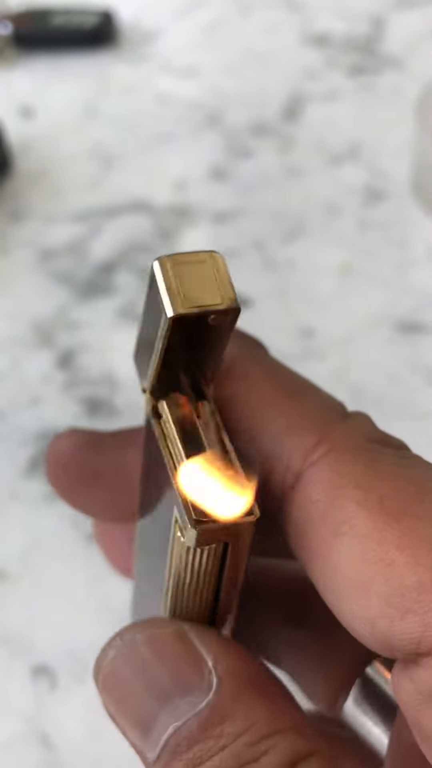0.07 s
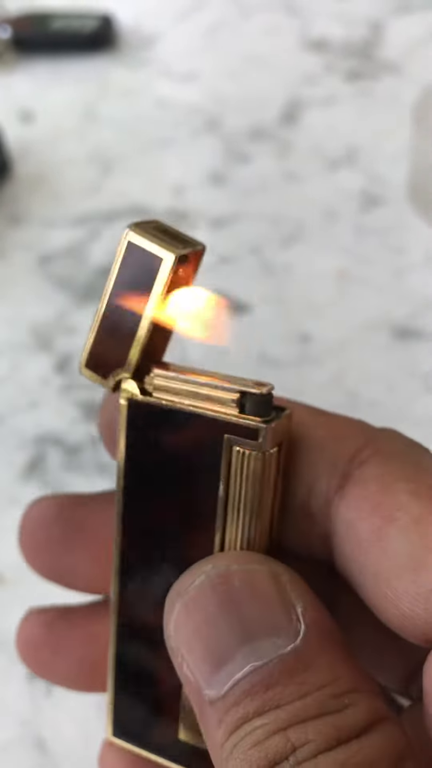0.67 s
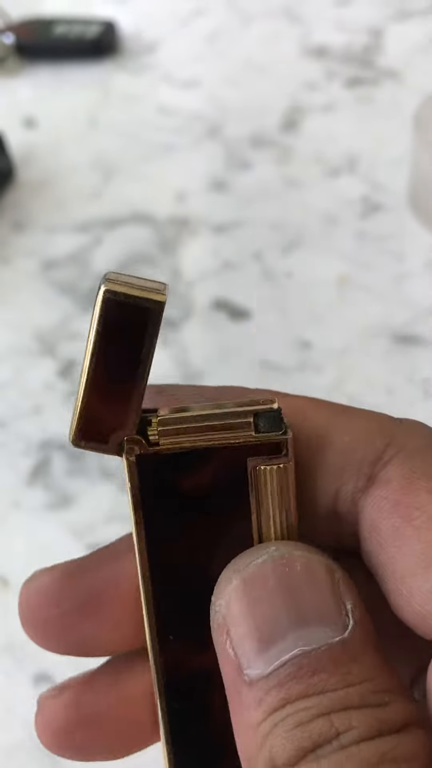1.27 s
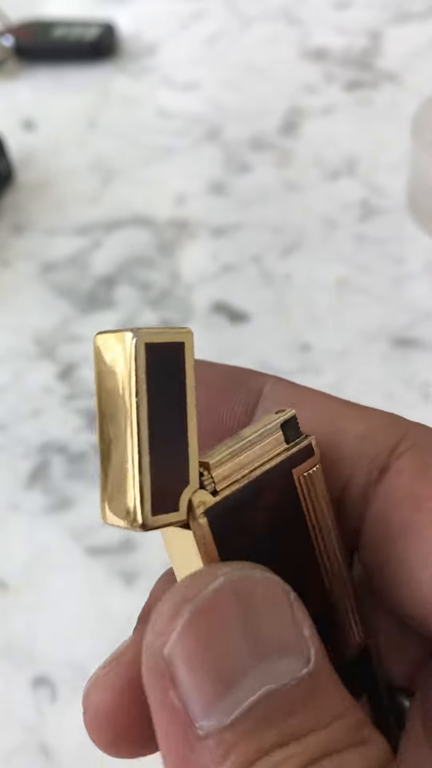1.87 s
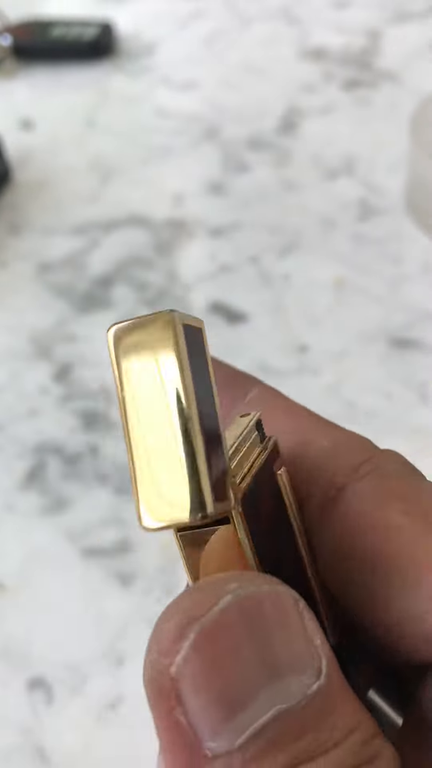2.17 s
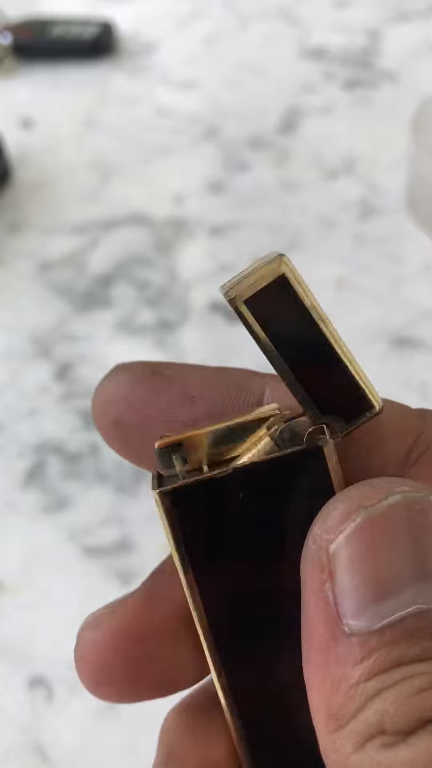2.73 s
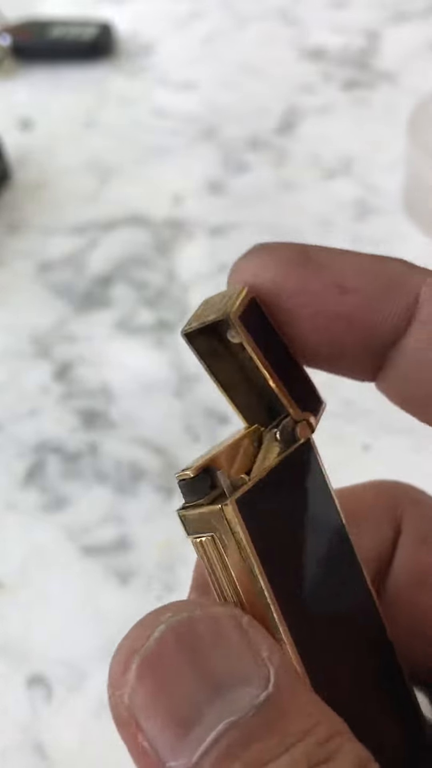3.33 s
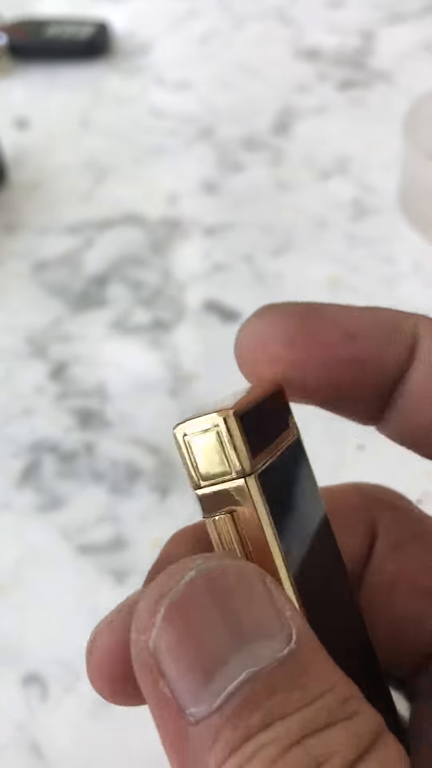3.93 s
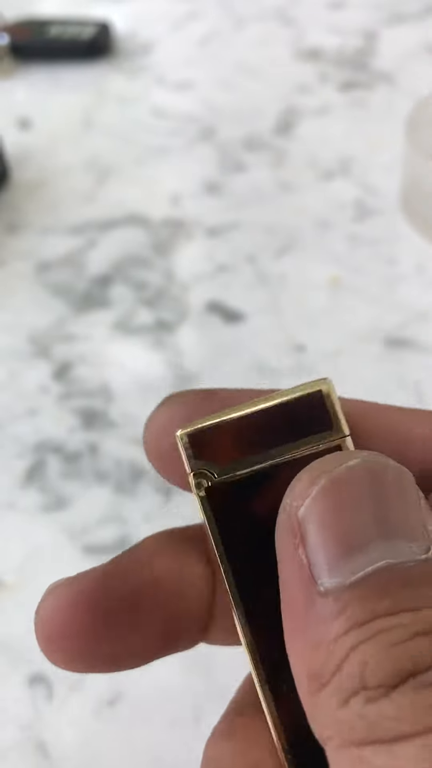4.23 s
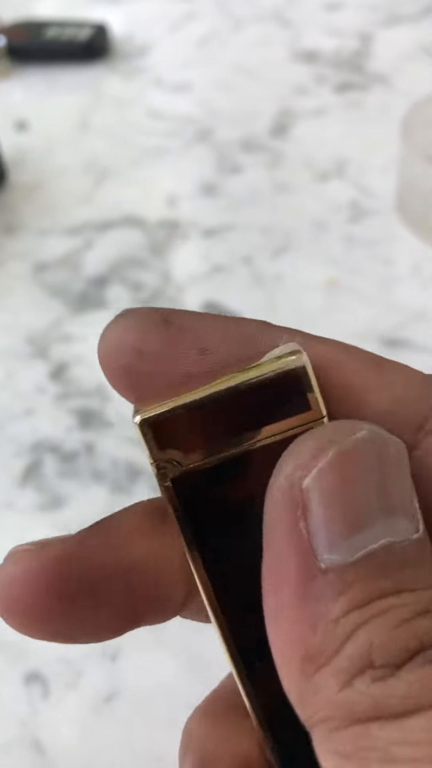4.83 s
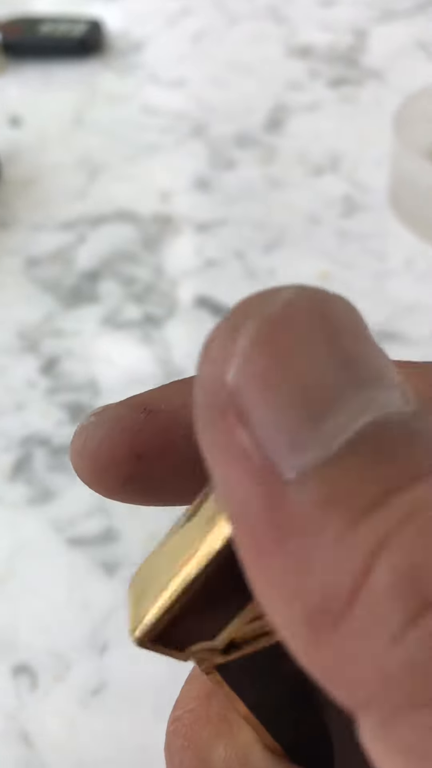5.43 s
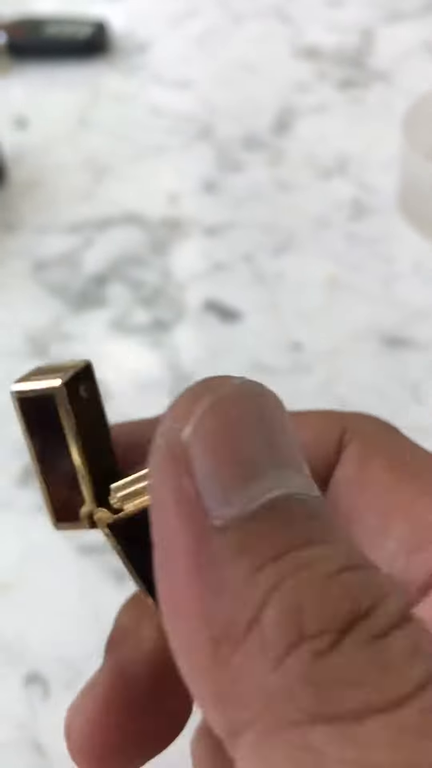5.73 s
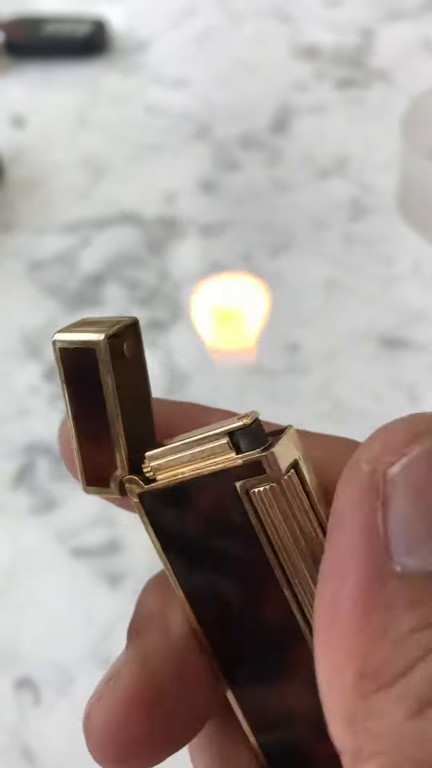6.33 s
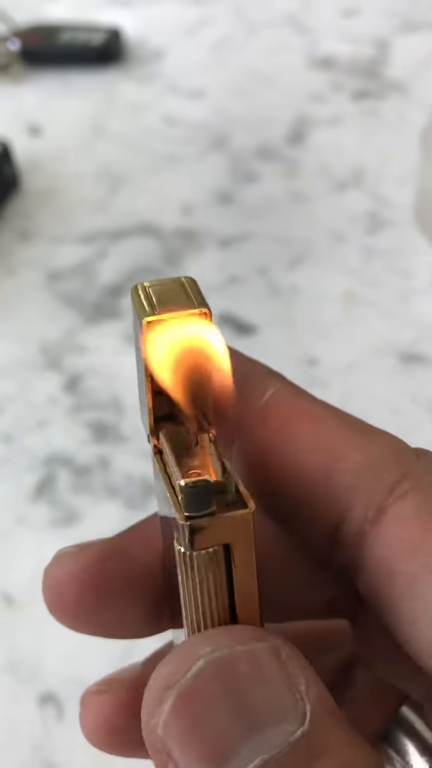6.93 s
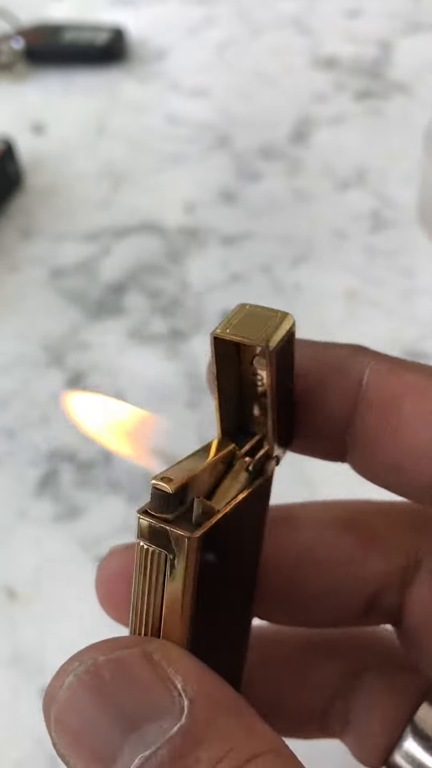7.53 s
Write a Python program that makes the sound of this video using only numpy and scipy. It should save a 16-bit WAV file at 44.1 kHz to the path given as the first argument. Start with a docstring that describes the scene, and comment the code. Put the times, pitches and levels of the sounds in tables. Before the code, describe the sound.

Close to the microphone in a quiet room with a low machine hum and hiss, a lighter's flame flutters out softly amid dull handling bumps. The hinge clicks, then the brass lid snaps shut, loud and sharp. After a few faint finger ticks, the lid flicks open with a bright, short ring. The wheel scrapes the flint once, the flame catches with a soft pop, and a small click follows.

```python
"""A brass flip-top lighter

A lighter is handled close to a microphone in a quiet room with a low machine hum. Its flame flutters
out in moving air, the hinge's spring-loaded cam clicks over and the lid snaps shut. The snap overloads
the recorder, which turns itself down for a moment. Later the lid is flicked open, ringing the brass
case, and the wheel scrapes the flint until the flame catches with a soft pop."""
import sys
import numpy as np
from scipy import signal
from scipy.fft import rfft, irfft, next_fast_len
from scipy.io import wavfile
from scipy.ndimage import uniform_filter1d, minimum_filter1d, map_coordinates

SR = 44100
rng = np.random.default_rng(int(sys.argv[2]) if len(sys.argv) > 2 else 0)


def wav_record(signal):
    """Record a signal, one row per channel, as 16-bit PCM in the file named by sys.argv[1]."""
    frames = np.transpose(np.atleast_2d(signal))
    bounded = np.clip(frames, -1, 1)
    # unit amplitude maps onto the largest positive 16-bit level
    quanta = np.round(bounded * 32767).astype(np.int16)
    wavfile.write(sys.argv[1], SR, quanta)


N = 339570


def amp(db):
    """Turn decibels into a gain."""
    return 10 ** (np.asarray(db) / 20)


def along(points, hz):
    """Read between (pitch_hz, value) points on a scale of octaves."""
    pitches, values = np.transpose(points)
    return np.interp(np.log(hz + 1), np.log(pitches + 1), values)


def swell(peak_s, db, rise_db_per_s, hold_s, fall_db_per_s):
    """A gain that climbs to db at peak_s, holds and dies away."""
    t = np.arange(N) / SR - peak_s
    drop_db = rise_db_per_s * np.maximum(-t, 0) + fall_db_per_s * np.maximum(t - hold_s, 0)
    return amp(np.maximum(db - drop_db, -140))


def wobble(rate_hz):
    """A smooth curve through rate_hz random values a second."""
    return map_coordinates(rng.standard_normal(int(N * rate_hz / SR) + 4), [np.arange(N) * rate_hz / SR])


def filtered(x, response):
    """Shape a sound with a response: a gain and phase for each frequency."""
    size = next_fast_len(len(x) + 8192)
    return irfft(rfft(x, size) * response(np.fft.rfftfreq(size, 1 / SR)), size)[:len(x)]


def ringing(modes):
    """The response of something that rings at a few pitches."""
    return lambda f: sum((-1) ** k * amp(db) * 1j * f * width / (hz * hz - f * f + 1j * f * width)
                         for k, (hz, width, db) in enumerate(modes))


def struck(modes, crack_db):
    """A part's ringing plus the broad crack of the hit itself."""
    return ringing(list(modes) + [(6000, 7200, crack_db)])


def colour(points):
    """A response that follows (pitch_hz, gain_db) points."""
    return lambda f: amp(along(points, f))


def noise(response, grain=1):
    """Shaped noise of average power 1; a varying grain roughens it."""
    return unit_power(filtered(rng.standard_normal(N) * grain, response))


def unit_power(x):
    """Scale a sound to an average power of 1."""
    return x / np.sqrt(np.mean(x ** 2) + 1e-20)


def add(track, start_s, sound):
    """Mix a sound into the track."""
    part = track[round(start_s * SR):][:len(sound)]
    part += sound[:len(part)]


def thud(db, pitch_hz, fade_s, attack_s=0.00026):
    """One low, muffled push. Here and below, fade_s is the time to fall by 60 dB."""
    t = np.arange(SR // 5) / SR
    return amp(db - 60 * t / fade_s) * np.sin(2 * np.pi * pitch_hz * t) * (1 - np.exp(-t / attack_s))


def contact(db, scrape_s, response, surface):
    """A short, rough scrape rings a part; db is its level if packed into one millisecond."""
    t = np.arange(len(surface)) / SR
    fade = amp(-60 * t / scrape_s) * (1 - np.exp(-20 * t / scrape_s))
    force = surface * fade
    # so brief a force drives all frequencies about equally
    for _ in range(3):
        flat_spectrum = np.exp(1j * np.angle(rfft(force)))
        force = irfft(flat_spectrum) * np.sqrt(fade)
    sound = filtered(force, response)
    return amp(db) * sound / np.linalg.norm(sound) * np.sqrt(SR / 1000)


def clatter(hits, response):
    """One or more contacts on the same rough spot."""
    out = np.zeros(N)
    surface = rng.standard_normal(2048)
    for start_s, db, scrape_s in hits:
        add(out, start_s, contact(db, scrape_s, response, surface))
    return out


# the machine's tones: pitch_hz, level_db
HUM_TONES = [(30, -47), (62, -62), (90, -57.5), (120, -54.5), (214, -63), (242, -62.5), (463, -62),
             (583, -66), (694, -67.5), (996, -66.5), (1335, -64), (1647, -62.5), (2073, -77), (2903, -70),
             (3112, -67)]
def machine_hum(drift=0.044):
    """A steady hum whose higher tones waver most."""
    t = np.arange(N) / SR
    out = np.zeros(N)
    for hz, db in HUM_TONES:
        waver = drift * np.sqrt(hz) * wobble(rate_hz=13)
        out += amp(db) * np.sqrt(2) * np.sin(2 * np.pi * hz * t + waver)
    return out


# tone colour of the room's air: pitch_hz, gain_db
AIR_COLOUR = [(20, -11.5), (45, -8), (70, -9.5), (130, -8.5), (200, -11), (300, -13.5), (400, -19.5),
              (560, -17), (780, -23), (1000, -18.5), (1600, -19.5), (2400, -19.5), (3200, -23.5),
              (4400, -28), (6000, -57)]
# tone colour of the microphone's hiss: pitch_hz, gain_db
HISS_COLOUR = [(2500, -52), (4300, 6), (5000, -2), (6000, 3), (7000, 2), (7700, -2), (9000, 1),
               (10250, -3.5), (11200, -14), (12500, -28.5), (13600, 0.5), (15000, 3.5), (16000, -0.5)]
# narrow peaks in the hiss: pitch_hz, width_hz, gain_db
HISS_PEAKS = [(1633, 90, 4.5), (5190, 280, -7), (6580, 260, -8.5), (9430, 240, -8.5), (10790, 300, -11),
              (12056, 240, 2), (13450, 410, -7.5)]
def air_and_hiss(air_db=-46, hiss_db=-56, whistle_db=-54):
    """Room air rushes softly under a faintly whistling microphone hiss."""
    air = amp(air_db) * noise(colour(AIR_COLOUR))
    hiss = amp(hiss_db) * noise(colour(HISS_COLOUR))
    return air + hiss + amp(whistle_db) * noise(ringing(HISS_PEAKS))


# tone colour of the flame's rush: pitch_hz, gain_db
FLAME_COLOUR = [(40, -14), (110, -3), (350, 0), (600, -6), (1000, -15), (2500, -45)]
# flaps of the flame, the last as it catches: peak_s, rush_db, pop_db
FLAME_FLAPS = [(.95, -50, -30), (1.044, -42.5, -20.5), (1.296, -42.5, -36), (1.412, -48, -30),
               (6.081, -49, -26)]
def flame():
    """The flame flaps in moving air or catches: a short, low rush with a pop at its height."""
    flaps = sum(swell(peak_s, db, rise_db_per_s=280, hold_s=0.0069, fall_db_per_s=330)
                for peak_s, db, _ in FLAME_FLAPS)
    out = noise(colour(FLAME_COLOUR)) * flaps
    for peak_s, _, pop_db in FLAME_FLAPS:
        add(out, peak_s, thud(pop_db, pitch_hz=169, fade_s=0.016))
    return out


# tone colour of air stirred by the hand: pitch_hz, gain_db
RUMBLE_COLOUR = [(25, -45), (45, -22), (65, 9.5), (90, -20), (150, -15.5), (400, -50)]
# turns of the hand: peak_s, hold_s, level_db, rise_db_per_s
HAND_TURNS = [(1.003, 0.47, -45, 13), (1.97, 0.68, -45, 70), (3.23, 0.056, -37, 55), (3.83, .08, -50, 110)]
# shifts of the grip: start_s, level_db
GRIP_BUMPS = [(1.219, -28), (1.39, -30), (1.468, -33), (1.579, -36), (1.856, -28.5), (2.115, -29.5)]
def hand():
    """Air rumbles as the hand turns the lighter, and the shifting grip makes dull bumps."""
    turns = [swell(peak_s, db, rise, hold_s, fall_db_per_s=90) for peak_s, hold_s, db, rise in HAND_TURNS]
    out = noise(colour(RUMBLE_COLOUR)) * np.max(turns, axis=0)
    for start_s, db in GRIP_BUMPS:
        add(out, start_s, thud(db, pitch_hz=81, fade_s=0.045))
    return out


# how the brass case rings: pitch_hz, width_hz, gain_db
CASE_RING = [(1390, 1800, -41), (2730, 500, -33), (3880, 250, -7), (4570, 200, 7.5), (4960, 260, -2),
             (5380, 290, -1), (6630, 390, 0), (7100, 420, -3), (8070, 320, -1.5), (8600, 220, -6),
             (9100, 210, -4), (9600, 230, 0.5), (11300, 540, -4), (12300, 370, -2), (13540, 500, -1),
             (14100, 770, -4.5), (15200, 700, -21)]
# light touches on the case: start_s, level_db, pitch_hz
FINGER_TICKS = [(1.9015, -40.5, 5700), (3.4382, -43, 5700), (3.985, -41, 5900), (3.995, -46, 5800),
                (4.9757, -47, 9200), (5.163, -40, 7140), (5.2381, -43.5, 8700), (5.94, -37, 4930)]
def finger_ticks(sharpness=11, case_db=-13, scrape_s=0.016):
    """The case ticks in the fingers, near one pitch each time, over a faint ring of brass."""
    out = np.zeros(N)
    for start_s, db, hz in FINGER_TICKS:
        tick = ringing([(hz, hz / sharpness, 0)])
        body = lambda f: amp(case_db) * ringing(CASE_RING)(f) - tick(f)
        out += clatter([(start_s, db, scrape_s)], body)
    return out


# how the spring-loaded cam rings: pitch_hz, width_hz, gain_db
CAM_RING = [(2930, 430, 1), (3800, 370, 4), (5100, 850, -1), (8050, 340, -7), (9400, 450, -2.5),
            (10450, 250, -3), (12500, 1800, -12)]
def hinge_cam(start_s=2.7648, db=-17, loss_db=8.5, first_gap_s=0.0045, shrink=0.54, scrape_s=0.005):
    """The cam, a small lever in the hinge, tips over and bounces, each time sooner and weaker."""
    bounces = []
    for k in range(3):
        delay_s = first_gap_s * (1 - shrink ** k) / (1 - shrink)
        bounces.append((start_s + delay_s, db - loss_db * k, scrape_s))
    return clatter(bounces, struck(CAM_RING, crack_db=-36))


# hits of the closing lid, timed from the hardest: offset_s, level_db, scrape_s
LID_HITS = [(-.0229, -32, .005), (-.0036, -23, .02), (0, 1, .0055), (.0027, -16, .007), (.0047, -6, .006),
            (.0118, -21.5, .035)]
# tone colour of the lid hitting the case: pitch_hz, gain_db
RIM_COLOUR = [(500, -37), (1300, -31), (1900, -20), (2400, -4), (2850, 2), (3600, -6), (4400, -1.5),
              (5500, -6), (6700, -10), (8600, -5), (10600, -7), (11500, 4), (12300, -1), (12900, 3),
              (13800, -3), (14500, 1), (15700, -1), (17000, -40)]
def lid_snap(shut_s):
    """The lid touches, rides over the catch, strikes, rebounds, seats and settles."""
    hits = [(shut_s + offset_s, db, scrape_s) for offset_s, db, scrape_s in LID_HITS]
    return clatter(hits, colour(RIM_COLOUR))


# low thuds around the lid's hardest hit: offset_s, level_db, pitch_hz, fade_s
LID_JOLTS = [(-.0006, -18.5, 78, 0.062), (.0026, -13, 202, 0.023)]
def lid_jolt(shut_s):
    """The closing lid jolts the lighter in the hand."""
    out = np.zeros(N)
    for offset_s, db, hz, fade_s in LID_JOLTS:
        add(out, shut_s + offset_s, thud(db, hz, fade_s))
    return out


# how the lid's catch rings: pitch_hz, width_hz, gain_db
CATCH_RING = [(6010, 350, -12), (8900, 510, 1)]
def lid_catch(start_s=5.4381, db=-29, scrape_s=0.0037):
    """The catch lets go of the lid with a small click."""
    return clatter([(start_s, db, scrape_s)], struck(CATCH_RING, crack_db=-22))


def lid_opening(peak_s=5.5022, peak_db=-8, growth_db=6, loss_db=7, gap_s=0.0019, scrape_s=0.0065):
    """The lid chatters against its stop, ringing the case over a faint knock."""
    knock = ringing([(600, 900, -27)])
    body = lambda f: struck(CASE_RING, crack_db=-19)(f) + knock(f)
    out = np.zeros(N)
    for k in range(-4, 3):  # hit 0 is the hardest
        db = peak_db + min(growth_db * k, -loss_db * k)
        out += clatter([(peak_s + gap_s * k, db, scrape_s)], body)
    return out


# tone colour of the scraped flint: pitch_hz, gain_db
FLINT_COLOUR = [(1000, -22), (2000, -14), (3000, -8), (4300, -3), (5400, -6), (7000, -5), (9500, -8),
                (11000, -8), (12300, -7), (13300, 0), (15200, -2), (16000, -8), (17000, -40)]
# how the wheel rings on its axle: pitch_hz, width_hz, gain_db
WHEEL_RING = [(3050, 250, -8), (4460, 220, 5), (5300, 300, -6), (7950, 480, -5), (13000, 2500, -13)]
# the wheel clicks as it stops and as the thumb leaves it: start_s, level_db
WHEEL_STOPS = [(6.0766, -36), (6.0796, -41), (6.2794, -27.5)]
def flint_wheel(peak_s=6.0625, rasp_db=-27.5, ring_db=-35.5, grit_db=1.5, click_scrape_s=0.004):
    """The thumb spins the wheel; its teeth grind the flint in uneven bites as it rings, then it clicks."""
    bites = rng.standard_normal(N) * amp(-grit_db * wobble(rate_hz=900))
    rasp = unit_power(filtered(bites, colour(FLINT_COLOUR)))
    ring = unit_power(filtered(bites, ringing(WHEEL_RING)))
    thumb = dict(hold_s=0.0075, fall_db_per_s=3200)  # holds briefly, then slips off
    rasp *= swell(peak_s, rasp_db, rise_db_per_s=700, **thumb)
    ring *= swell(peak_s, ring_db, rise_db_per_s=450, **thumb)
    clicks = [(start_s, db, click_scrape_s) for start_s, db in WHEEL_STOPS]
    return rasp + ring + clatter(clicks, struck(WHEEL_RING, crack_db=-26))


# how long the room's echo lasts: pitch_hz, fade_s
ECHO_FADES = [(200, 0.24), (3000, 0.28), (8000, 0.22), (15000, 0.17)]
def room_echo(x, gap_s=0.00124):
    """The walls answer after a tiny gap, the treble dying first."""
    hz, t, spectrum = signal.stft(rng.standard_normal(SR // 2), SR, nperseg=256)
    fade = amp(-60 * t / along(ECHO_FADES, hz)[:, None])
    tail = signal.istft(spectrum * fade, SR, nperseg=256)[1]
    tail *= np.arange(len(tail)) / SR > gap_s
    return signal.fftconvolve(x, tail / np.linalg.norm(tail))[:N]


def scene(shut_s=3.5699, snap_echo_db=-15, click_echo_db=-27):
    """The lighter close up; the hard snap fills the room most."""
    snap = lid_snap(shut_s)
    clicks = hinge_cam() + lid_catch() + lid_opening() + finger_ticks() + flint_wheel()
    echo = amp(snap_echo_db) * room_echo(snap) + amp(click_echo_db) * room_echo(clicks)
    return snap + clicks + echo + flame() + hand() + lid_jolt(shut_s) + machine_hum() + air_and_hiss()


def record(dry, overload_power=0.38, dip_db=-5, hold_s=0.201, recover_s=0.008, ceiling=0.8, top_hz=15850):
    """An overload turns the level down briefly; peaks are held back and the highest treble is cut."""
    overload = uniform_filter1d(dry ** 2, size=44) > overload_power
    t = np.arange(N) / SR
    since_overload_s = t - np.maximum.accumulate(np.where(overload, t, -1))
    recovered = np.clip((since_overload_s - hold_s) / recover_s + 0.5, 0, 1)
    dipped = dry * amp(dip_db * (1 - recovered))
    safe_gain = ceiling / np.maximum(np.abs(dipped), ceiling)
    limited = dipped * uniform_filter1d(minimum_filter1d(safe_gain, size=9), size=9)
    return filtered(limited, lambda hz: hz < top_hz)


dry = scene()
out = record(dry)
wav_record(out)
```